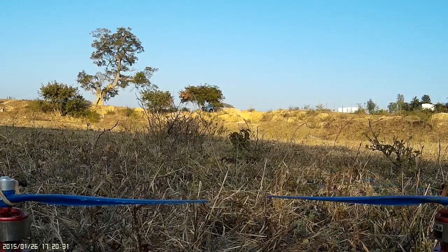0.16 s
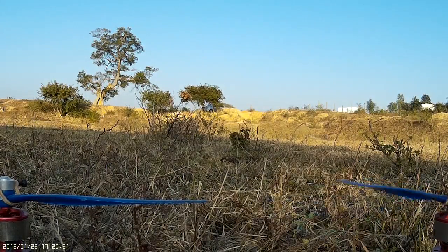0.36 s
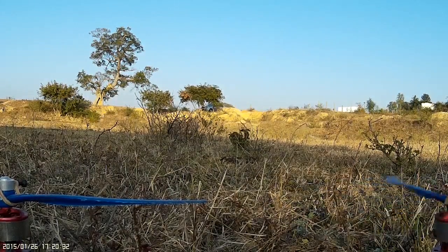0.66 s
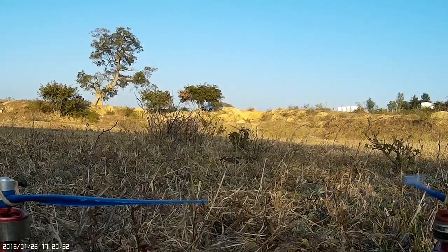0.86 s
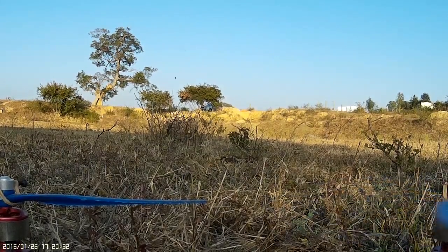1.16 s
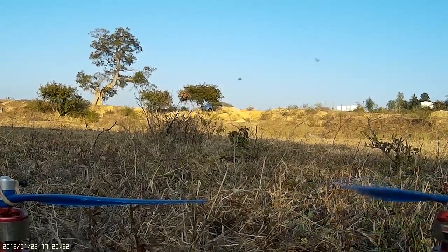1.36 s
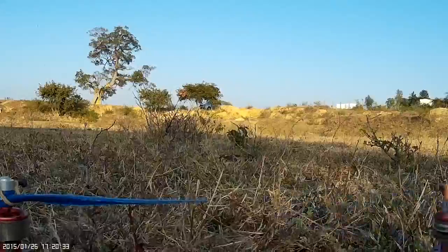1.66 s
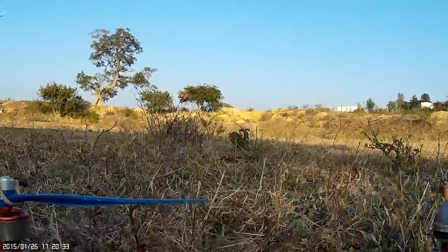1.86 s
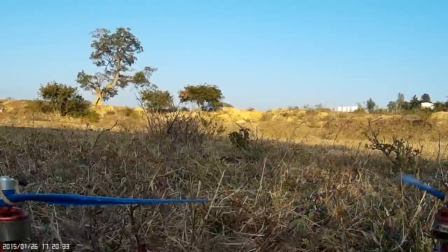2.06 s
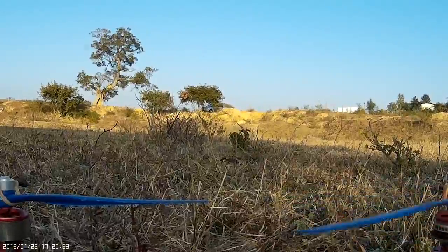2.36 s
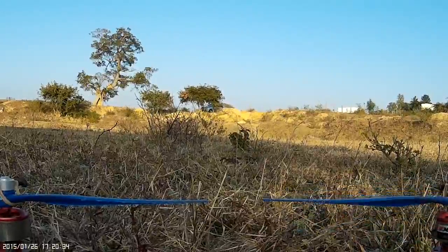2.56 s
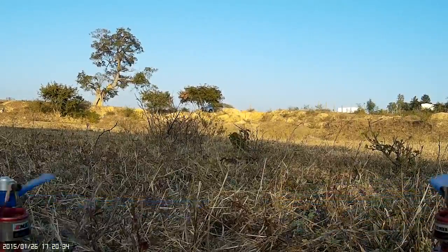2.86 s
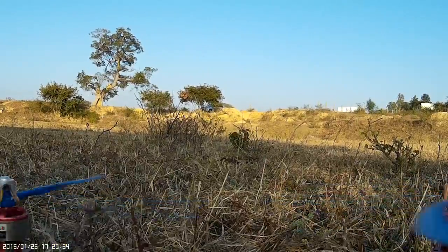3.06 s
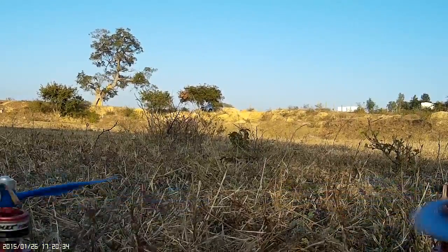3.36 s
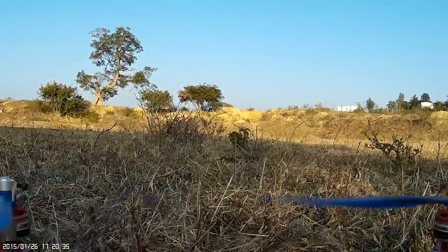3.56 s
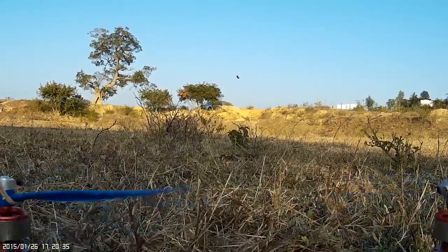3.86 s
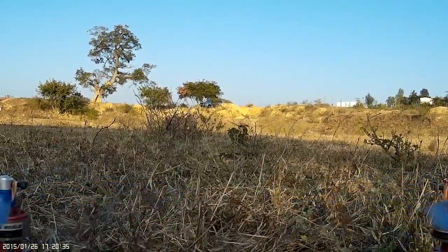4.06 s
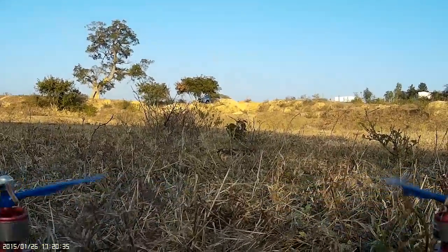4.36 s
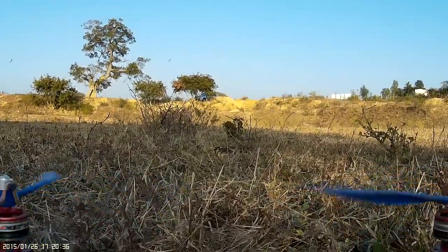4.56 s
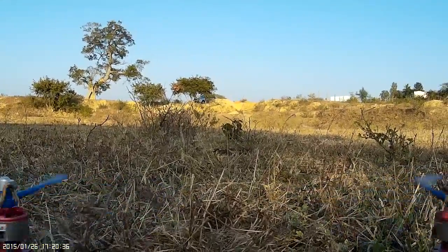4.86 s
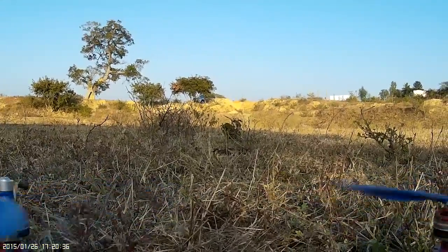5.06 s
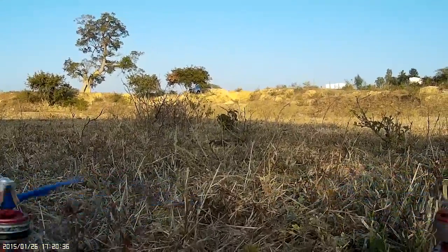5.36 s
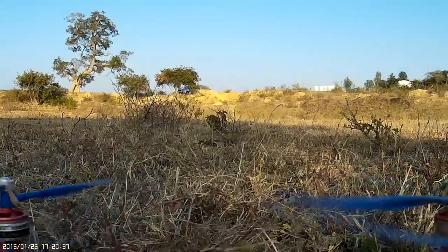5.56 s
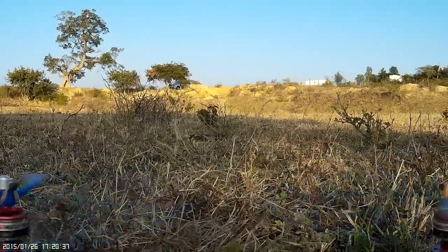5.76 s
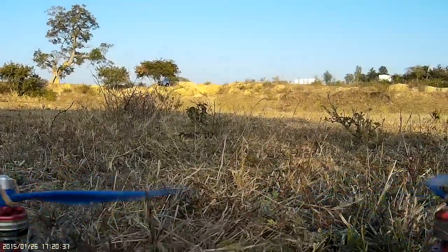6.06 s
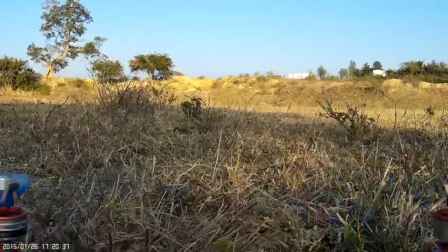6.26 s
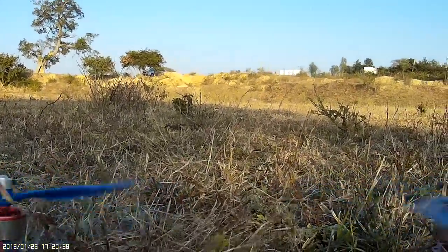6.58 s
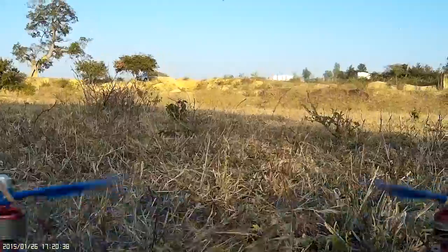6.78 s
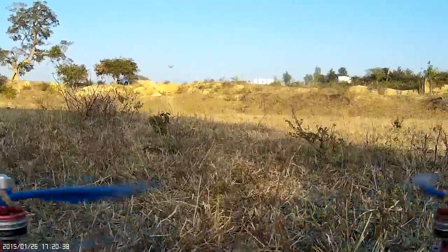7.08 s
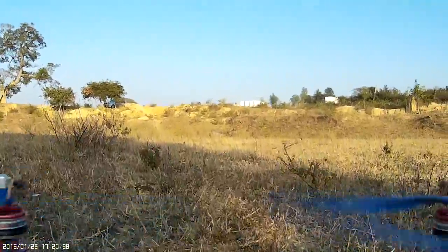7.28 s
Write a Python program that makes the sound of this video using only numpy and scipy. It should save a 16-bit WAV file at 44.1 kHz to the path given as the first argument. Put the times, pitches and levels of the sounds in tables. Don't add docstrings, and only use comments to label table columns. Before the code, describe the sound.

The microphone sits on the frame of a small four-propeller drone in an open dry field, so everything is close and dry. At once a few tiny clicks and stuttering catches, then the motors whir up over the first 0.9 s into a rough, metallic buzz with a fixed, piercing, slightly beating whine near 8 kHz. Pitch climbs until 1.7 s while low wash rumble builds. Power drops; from 1.85 s the buzz slides down, with hard knocks at 2.0 s and a quick run of stem taps to 2.2 s, fading to near quiet by 2.5 s. At 2.6 s clicks and the whine return, with a sharp knock near 2.9 s. The motors rise again, settling by 4.2 s into uneven humming, airy hiss and gusty rumble. A straw flicks rapidly around 4.1-4.3 s; bright chaff ticks scatter from 5.8 to 6.8 s. The rumble weakens as pitch eases at 7.4 s.

```python
import sys
import numpy as np
from scipy import signal
from scipy.fft import rfft, irfft
from scipy.io import wavfile
from scipy.ndimage import uniform_filter1d

SR = 44100
rng = np.random.default_rng(int(sys.argv[2]) if len(sys.argv) > 2 else 0)


def invert_db(level):
    return 10 ** (np.asarray(level, dtype=float) / 20)


def wav_record(signal):
    frames = np.transpose(np.atleast_2d(signal))
    bounded = np.clip(frames, -1, 1)
    quanta = np.round(bounded * 32767).astype(np.int16)
    wavfile.write(sys.argv[1], SR, quanta)


N = 327222
T = np.arange(N) / SR
RESTART_S = 2.609
FULL_SPEED = 60

# time in seconds, turns per second.
LEAD_SPEED = [(.04, 2), (.22, 14), (.62, 47), (.9, 58), (1.7, 73.5), (1.85, 68.5), (2.2, 33), (2.47, 13.5),
              (2.59, 3.5), (2.61, 0), (3.05, 40), (3.27, 49), (4.2, 64.3), (4.87, 65.5), (5.25, 69.2),
              (5.9, 67), (6.7, 69), (7.41, 61.5)]
# time in seconds, turns per second less.
LATE_MOTOR_LAG = [(.04, 4), (.22, 9.5), (.56, 12.5), (1.05, 7.6), (2, 5.5), (2.3, .5), (2.62, .5),
                  (2.9, 22), (3.1, 29), (3.3, 29.5), (4.2, 36), (5.2, 38.4), (5.85, 20), (6.5, 18),
                  (7.41, 2)]
STUCK_MOTOR_LAG = [(2.6, 80), (2.63, 2), (3.08, 22), (3.45, 19.5), (4.2, 24.5), (4.6, 23), (5.2, 27),
                   (5.9, 18.5), (6.5, 18), (6.8, 14), (7.41, -3)]
CLOSE_MOTOR_LAG = [(.7, 0), (.9, 3.8), (1.55, 7), (2, 6), (2.15, .5), (2.62, .5), (2.8, 6.5), (3.05, 8.8),
                   (3.6, 5.3), (4.9, 4), (5.5, 5.8), (6.75, 6), (7.1, .6), (7.41, -2.3)]


def shaft_speeds():
    lead = curve(LEAD_SPEED)
    lags = (LATE_MOTOR_LAG, STUCK_MOTOR_LAG, [(0, 0)], CLOSE_MOTOR_LAG)
    return [np.maximum(lead - curve(lag), .4) for lag in lags]


def turns(speed):
    hunting = 1 + .002 * flutter(30)
    return np.cumsum(uniform_filter1d(speed, size=5000) * hunting) / SR


# time in seconds, level in dB.
MOTOR_CURRENT = [(.04, -28), (.2, -20.5), (.4, -15.5), (.8, -17.5), (1.5, -20.5), (1.72, -20.5), (2.0, -35),
                 (2.45, -35.5), (2.6, -26), (2.68, -22), (2.9, -15), (3.5, -18), (3.7, -19), (5.2, -21.5),
                 (5.6, -21.5), (6.3, -22.5), (7.42, -24.5)]


def current_level():
    return curve(MOTOR_CURRENT)


# start in seconds, end in seconds.
POWERED_RUNS = [
    (.041, 2.45),
    (2.609, 7.5),
]
# start of a drop-out in seconds, its end in seconds.
FIRST_STUTTERS = [
    (.0445, .048),
    (.054, .0655),
    (.075, .085),
]


def powered():
    stutter = sum(1. * (T > a) * (T < b) for a, b in FIRST_STUTTERS)
    caught = 1 - 0.49 * uniform_filter1d(stutter, size=60)
    runs = 0
    for a, b in POWERED_RUNS:
        ramp = np.clip(0.37 + np.minimum(T - a, b - T) / 0.17, 0, 1)
        runs = runs + (T > a) * (T < b) * ramp
    return caught * runs


# start in seconds, end in seconds, change in dB.
GRASS_BRUSHING = [
    (1.013, 1.397, 3.5),
    (1.86, 2.214, 2.5),
    (3.155, 3.506, 2.5),
    (3.757, 4.466, 4),
    (6.266, 6.82, 2),
    (6.983, 7.327, -3.5),
]


def grass_level():
    brushing = sum(db * (T > a) * (T < b) for a, b, db in GRASS_BRUSHING)
    return uniform_filter1d(brushing, size=2000)


def driven_level():
    return current_level() + 20 * np.log10(powered() + 1e-4) + grass_level()


# frequency in Hz, turns ahead at the start.
CHOPPER_CLOCKS = [(7990.6, 0), (7995.42, .42), (8011.75, .47), (8016.9, .33)]
SIDEBAND_ORDERS = [-56, -49, -42, -21, -14, 14, 21, 42]
# one motor, with the level in dB under the whine for each multiple above.
SIDEBAND_DB = [(-40, -40, -34, -31, -26, -27, -31, -33), (-40, -40, -36, -33, -26, -28, -34, -40),
               (-40, -27, -31, -24, -34, -25, -34, -28), (-31, -40, -32, -36, -22, -31, -38, -38)]
OCTAVE_SIDEBAND_DB = [-41, -54, -38, -47]
# first run in dB, second run in dB.
WHINE_TRIMS = [(-2, -.5), (-14.5, -11), (1.5, 0.8), (-12.5, -6.5)]
# time in seconds, level in dB.
COASTING_CHOP = [(1.95, -38.5), (2.3, -19.5), (2.42, -38), (2.5, -55)]


def whine(angles, shafts, bells_db):
    idle_db = np.where(T < COASTING_CHOP[0][0], -90, curve(COASTING_CHOP))
    chop_db = joined(current_level(), idle_db)
    whines = []
    for trim_db, speed in zip(WHINE_TRIMS, shafts):
        held_db = -0.13 * (shafts[2] - speed)
        whines.append(chop_db + np.where(T < RESTART_S, *trim_db) + held_db)
    drive = np.sqrt(sum(invert_db(w) ** 2 for w in whines))
    load = invert_db(bells_db + 4)
    out = np.zeros(N)
    motors = zip(CHOPPER_CLOCKS, whines, angles, SIDEBAND_DB, OCTAVE_SIDEBAND_DB)
    for (hz, ahead), level, angle, side_db, octave_db in motors:
        clock = hz * T + ahead
        waver = invert_db(3.0 * flutter(12))
        speed = np.gradient(angle) * SR
        out += invert_db(level + .5 * flutter(60)) * np.cos(2 * np.pi * clock)
        out += invert_db(octave_db) * waver * drive * np.cos(2 * np.pi * (2 * clock - 14 * angle))
        for k, db in zip(SIDEBAND_ORDERS, side_db):
            strength = invert_db(db + frame_level(hz + k * speed)) * (load if abs(k) > 30 else drive)
            out += strength * np.roll(waver, 900 * k) * np.cos(2 * np.pi * (clock + k * angle))
    return np.sqrt(2) * out * powered()


# frequency in Hz, level in dB.
FRAME_RESPONSE = [(300, -40), (700, -20), (880, 3), (1500, -2), (2300, -9), (2700, -17), (3300, -12),
                  (4300, 0), (4650, 8), (5100, 5), (5500, -6), (5900, 3), (7800, 0), (9000, -3), (9600, -9),
                  (11500, -18)]


def frame_level(hz):
    return read(FRAME_RESPONSE, hz)


def buzz(angles, lead, arms_db, bells_db):
    shake, jolts = flutter(54), steps(angles)
    return (arm_buzz(jolts, shake, lead, arms_db) + bell_rattle(jolts, shake, angles, lead, bells_db)
            + air_hiss(shake, lead))


def steps(angles):
    jolts = sum(np.diff(np.floor(42 * a), prepend=0) * rng.standard_normal(N) for a in angles)
    density = uniform_filter1d(jolts ** 2, size=2000) + 1e-4
    return jolts / np.sqrt(density) + .35 * rng.standard_normal(N)


def bells_level(lead):
    decades = np.log10(lead / FULL_SPEED)
    driven_db = driven_level() - 1 - np.maximum(decades, -1) - 0.65 * grass_level()
    free_db = -26.5 + 36 * decades - 30 * (T < .041)
    return joined(driven_db, free_db)


# frequency in Hz, level in dB per Hz.
BELL_SPECTRUM = [(1180, -61), (2000, -13), (2250, -11.5), (2610, -9.5), (3230, -8), (3890, 0.5), (4520, -1),
                 (5150, -3.5), (5420, -4.5), (6840, -7), (7670, -6.5), (7800, -1.5), (10100, -32),
                 (17200, -120)]
# frequency in Hz, width in Hz, level in dB.
BELL_RINGS = [(3550, 100, -4), (4030, 80, -10.5), (4375, 154, 4.5), (4570, 210, 4.5), (5015, 94, 0),
              (6545, 120, -17)]
# time in seconds, half length in seconds, change in dB.
BELL_SWELLS = [
    (0.707, 0.057, 3),
    (1.53, 0.074, 6),
    (3.903, .15, 4),
    (5.1, 0.17, 4.5),
    (7.31, 0.18, 6.5),
]


def bell_rattle(jolts, shake, angles, lead, bells_db):
    pulling = np.clip((current_level() + 36) / 6, 0, 1)
    under_speed = np.clip((57.5 - lead) / 6, 0, 1)
    sing_db = -5 + 6 * under_speed * np.clip(lead / 22, .45, 1) * pulling
    sing_db += bumps(BELL_SWELLS) - 8 * (1 - pulling)
    bells = colour(jolts, BELL_SPECTRUM) + invert_db(sing_db + 1.5 * flutter(6)) * ring(steps(angles), BELL_RINGS)
    bells *= invert_db(bells_db - 5.5 + 0.95 * shake + 0.63 * flutter(9.9))
    skirt = colour(rng.standard_normal(N), [(7500, -13), (8000, 23.0), (8300, -18)])
    return bells + invert_db(bells_db - 13.5) * skirt


def arms_level(lead):
    spun_db = -21 + 11.5 * np.log10(lead / FULL_SPEED)
    spun_db = spun_db - 20 * np.log10(1 + (15.1 / lead) ** 3) + .5 * grass_level()
    return joined(spun_db, driven_level() - 13.5)


# frequency in Hz, level in dB per Hz.
ARM_SPECTRUM = [(180, -18), (300, -23.5), (397, -6), (455, -9.5), (602, -8.5), (833, -2.5), (1020, -3),
                (1580, -4.5), (2230, -18), (2600, -14.5), (3380, -16), (5720, -120)]
# frequency in Hz, width in Hz, level in dB.
ARM_RINGS = [(72, 40, -14), (872, 60, 1), (1130, 130, -10), (1430, 200, -11)]


def arm_buzz(jolts, shake, lead, arms_db):
    bare = np.clip(1.5 - lead / 36, .05, .85)
    arms = np.sqrt(1 - bare) * colour(rng.standard_normal(N), ARM_SPECTRUM)
    arms += np.sqrt(bare) * ring(jolts, ARM_RINGS)
    return arms * invert_db(arms_db - 1.32 + 1.36 * shake)


# frequency in Hz, level in dB per Hz.
AIR_SPECTRUM = [(4790, -37), (8150, -31), (8330, -25), (8450, -5), (11300, -12.5), (12200, -15),
                (13200, -14.5), (15700, -29)]


def air_hiss(shake, lead):
    free_db = -40 + 35 * np.log10(lead / FULL_SPEED) + grass_level()
    air_db = joined(driven_level() - 22.5, free_db)
    flecks = invert_db(0.68 * shake + 2.0 * flutter(130)) * rng.standard_normal(N)
    return invert_db(air_db) * colour(flecks, AIR_SPECTRUM)


HUM_ORDERS = [1, 2, 4, 6, 8, 14]
HUM_DB = [-38, -22, -31, -33, -40, -33]
HUM_TRIMS = [-5.5, -3, -3.5, -6]


def hum(angles, shafts, arms_db):
    out, arms = np.zeros(N), invert_db(arms_db)
    coast_db = 5 * np.clip((-30 - current_level()) / 5, 0, 1)
    for speed, angle, trim_db in zip(shafts, angles, HUM_TRIMS):
        waver = invert_db(4.6 * flutter(15.3))
        for k, db in zip(HUM_ORDERS, HUM_DB):
            strength = invert_db(db + trim_db) * (speed / 66) ** 2.8 * np.roll(waver, 5000 * k)
            out += strength * np.cos(2 * np.pi * (k * angle + rng.random()))
        for k in (42, 84):
            level_db = trim_db - 14 - speed / 5 + coast_db + frame_level(k * speed)
            strength = invert_db(level_db) * arms * np.roll(waver, 500 * k)
            out += strength * (speed > 3) * np.cos(2 * np.pi * k * angle)
    return np.sqrt(2) * out


# time in seconds, frequency in Hz, level in dB.
MOTOR_TONES = [
    [(.55, 600, -40), (.85, 800, -29), (1.2, 870, -28), (1.7, 960, -28), (1.95, 840, -31)],
    [(1.05, 750, -33), (1.4, 822, -23), (1.7, 868, -25), (1.95, 775, -27)],
    [(3.8, 760, -35), (4.2, 832, -25), (4.5, 850, -25), (5, 885, -30), (5.3, 915, -30), (5.8, 885, -31),
     (7.4, 870, -33)],
    [(4.6, 790, -31), (5.3, 838, -26), (5.7, 785, -28), (6.6, 795, -33), (7.4, 810, -30)],
    [(4.75, 5680, -42), (5.1, 5760, -37), (5.3, 5870, -37), (5.55, 5830, -41)],
    [(4.8, 4640, -31), (5.5, 4590, -32)],
    [(7.12, 4590, -32), (7.5, 4640, -29)],
]


def motor_tones():
    out = np.zeros(N)
    for rows in MOTOR_TONES:
        fade = np.clip(np.minimum(T - rows[0][0], rows[-1][0] - T) / 0.06, 0, 1)
        phase = np.cumsum(curve(rows) * (1 + 0.0039 * flutter(25.6))) / SR
        out += fade * invert_db(curve(rows, 2) - .5 + 2.2 * flutter(12)) * np.cos(2 * np.pi * phase)
    return np.sqrt(2) * out


# frequency in Hz, level in dB per Hz.
WASH_SPECTRUM = [(12, -35), (20, -2.5), (92, -1.5), (128, -7), (173, -5.5), (269, -8.5), (325, -12),
                 (500, -17), (650, -15), (1100, -120)]
# time in seconds, half length in seconds, change in dB.
WASH_GUSTS = [
    (3.72, .06, 5.5),
    (4.055, 0.051, 5),
    (4.934, 0.52, -3.5),
    (6.686, 0.11, 4.5),
    (7.022, .06, 6),
    (7.42, 0.092, -12),
]


def wash(lead):
    air_speed = np.interp(T - 0.12, T, lead)
    calm_db = -53
    full_db = -20 + bumps(WASH_GUSTS) + 4 * (T > RESTART_S)
    wash_db = calm_db + (full_db - calm_db) / (1 + np.exp((36.8 - air_speed) / 6.1))
    lumps = invert_db(3.3 * flutter(15.0)) * rng.standard_normal(N)
    return invert_db(wash_db - 3.0) * colour(lumps, WASH_SPECTRUM)


# start in seconds, peak in dB, top over bottom in dB.
STEM_KNOCKS = [(0.0426, -40, 12), (0.0487, -33, 7), (0.0685, -22, 5), (0.087, -26, -14), (0.1003, -20, -31),
               (2.0024, -8, -5), (2.036, -4, -1), (2.4394, -31, -1), (2.4544, -37, -13), (2.4794, -40, -14),
               (2.561, -40, 11.5), (2.5825, -39, 2), (2.609, -42, -8), (2.6223, -26, -5), (2.6703, -33, -2),
               (2.689, -20, 6), (2.7207, -17, -9), (2.8734, -9, -3)]
# frequency in Hz, level in dB, time to fall 60 dB in seconds.
KNOCK_RINGS = [(1500, 0, .008), (3800, -2, .006), (4800, -4, .004), (6400, -5, .003)]


def taps():
    out, t = np.zeros(N + 2000), np.arange(1500) / SR
    rows = STEM_KNOCKS + [(2.1037 + .01312 * k, -11 + 1.7 * k, -9) for k in range(8)]
    for (s, db, top_db), chance in zip(rows, rng.random((len(rows), 8))):
        for (hz, mode_db, t60), u, v in zip(KNOCK_RINGS, chance, chance[4:]):
            tone = np.sin(2 * np.pi * (hz * (0.942 + 0.13 * u) * t + v))
            knock = tone * invert_db(-60 * t / t60) * np.minimum(t / 0.0005, 1)
            out[round(s * SR):][:1500] += invert_db(db + mode_db - 1.5 + (top_db + 5) * (hz > 3000)) * knock
    return out[:N]


# start in seconds, peak in dB.
CHAFF_HITS = [
    (4.3143, -15),
    (5.8169, -9),
    (5.9232, -14),
    (6.3238, -12),
    (6.3682, -15),
    (6.5099, -12),
    (6.5478, -12),
    (6.8361, -13),
]


def ticks():
    out, t = np.zeros(N + 2000), np.arange(1500) / SR
    straw = [(4.1 + .01872 * k, -16 + 3.5 * u) for k, u in enumerate(rng.standard_normal(10))]
    rows = CHAFF_HITS + straw
    for (s, db), hiss in zip(rows, rng.standard_normal((len(rows), 1500))):
        puff = invert_db(db - 3.0 - 60 * t / 0.039) * np.minimum(t / 0.0014, 1) * hiss
        out[round(s * SR):][:1500] += puff
    bright = signal.butter(2, [6000, 12500], "band", fs=SR, output="sos")
    return signal.sosfilt(bright, out[:N])


def background():
    spectrum = [(40, -6), (70, 0.0), (300, -2), (2000, -18), (8500, -22)]  # Hz, dB per Hz
    return invert_db(-61.5) * colour(rng.standard_normal(N), spectrum)


def evened(x):
    return x / np.sqrt(np.mean(x ** 2) + 1e-20)


def curve(rows, column=1):
    rows = np.array(rows)
    return np.interp(T, rows[:, 0], rows[:, column])


def bumps(rows):
    return sum(db * np.exp(-((T - s) / half) ** 2) for s, half, db in rows)


def read(points, hz):
    f, db = np.transpose(points)
    return np.interp(np.log(np.abs(hz) + 1), np.log(f + 1), db, -80, -80)


def colour(x, points):
    gain = invert_db(read(points, np.fft.rfftfreq(2 ** 19, 1 / SR)))
    return evened(irfft(rfft(x, 2 ** 19) * gain)[:N])


def ring(x, modes):
    hz = np.fft.rfftfreq(2 ** 19, 1 / SR)
    response = sum(invert_db(db) / (1 + 2j * (hz - centre_hz) / width) ** 2 for centre_hz, width, db in modes)
    return evened(irfft(rfft(x, 2 ** 19) * response)[:N])


def flutter(hz):
    smooth = uniform_filter1d(rng.standard_normal(N), int(SR / hz / 4) + 1)
    return evened(signal.lfilter([1], [1, -np.exp(-2 * np.pi * hz / SR)], smooth))


def joined(a_db, b_db):
    return 10 * np.log10(invert_db(a_db) ** 2 + invert_db(b_db) ** 2)


def scene():
    shafts = shaft_speeds()
    lead = shafts[2]
    angles = [turns(speed) for speed in shafts]
    arms_db, bells_db = arms_level(lead), bells_level(lead)
    motors = whine(angles, shafts, bells_db) + buzz(angles, lead, arms_db, bells_db)
    motors += hum(angles, shafts, arms_db) + motor_tones()
    return (motors + wash(lead) + taps() + ticks() + background())[None]


def low_pass(x):
    return signal.sosfilt(signal.butter(12, 15830, fs=SR, output="sos"), x)


def record(dry):
    mix = 0.88 * np.tanh(dry / 0.96)
    return low_pass(mix)


dry = scene()
out = record(dry)
wav_record(out)
```